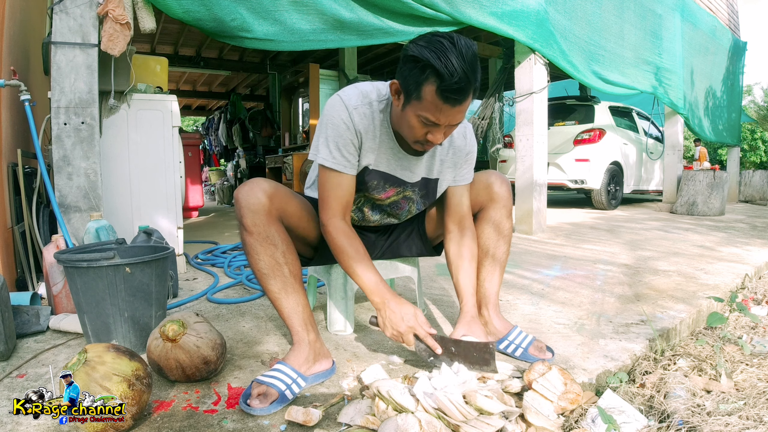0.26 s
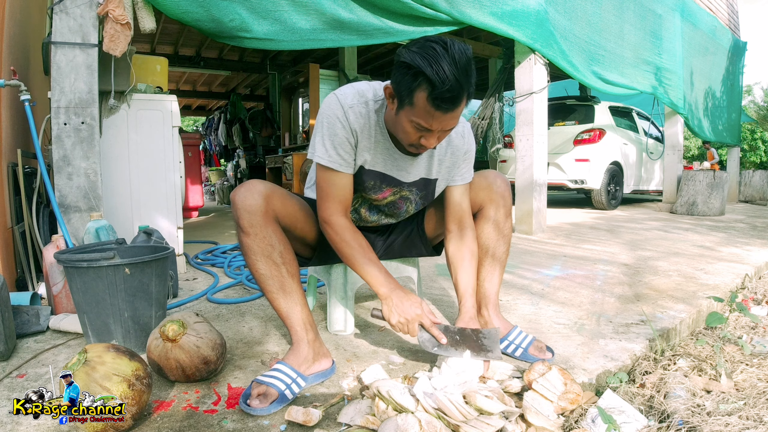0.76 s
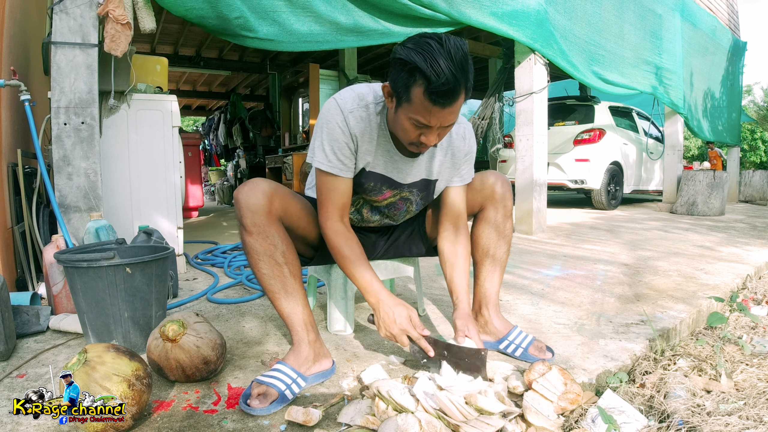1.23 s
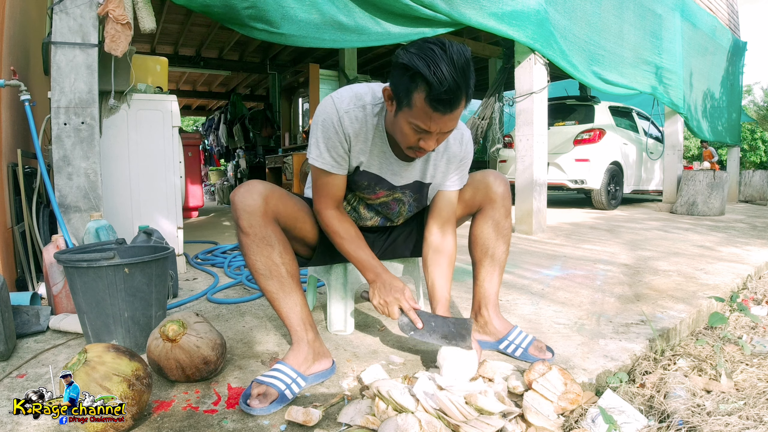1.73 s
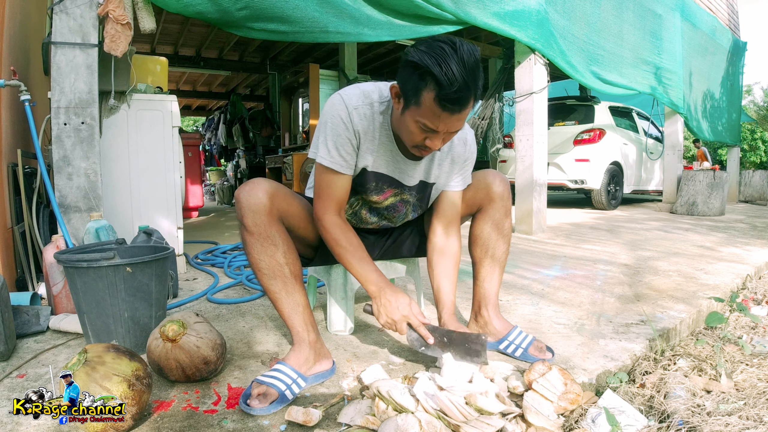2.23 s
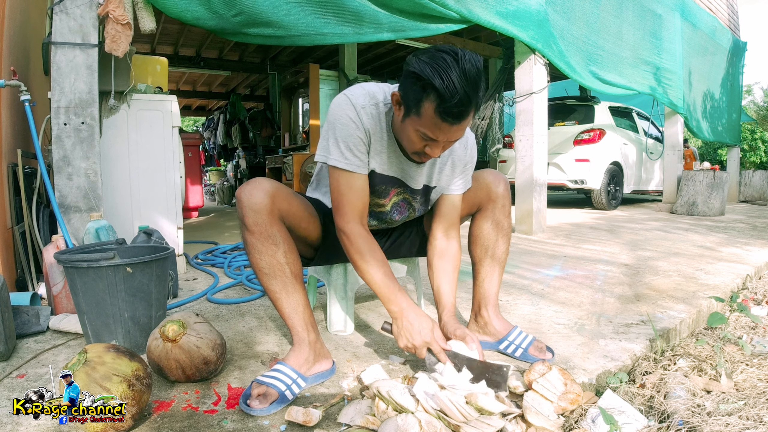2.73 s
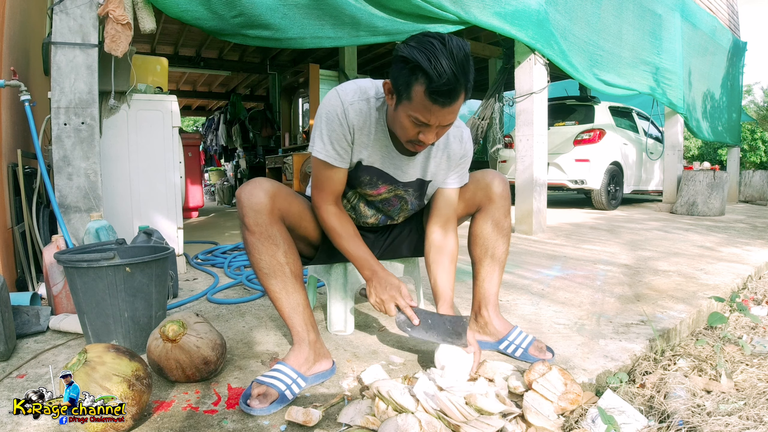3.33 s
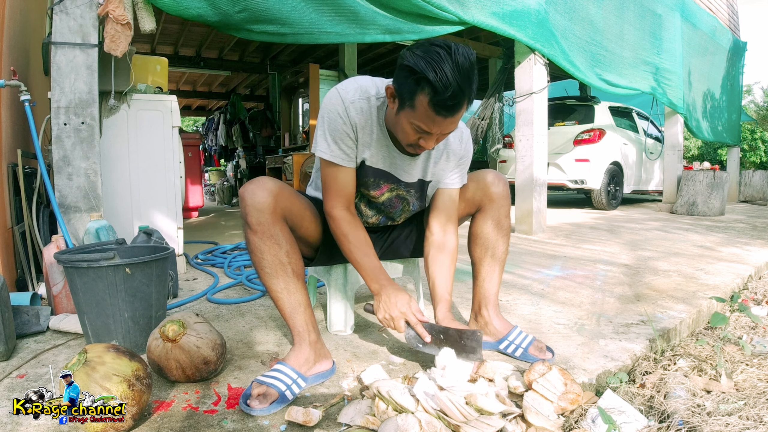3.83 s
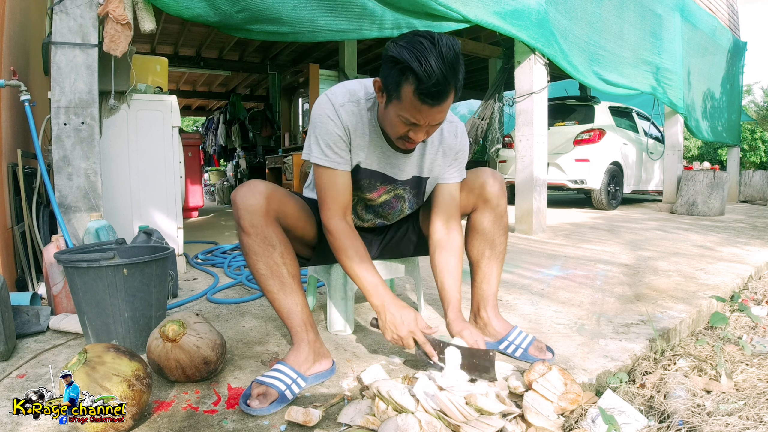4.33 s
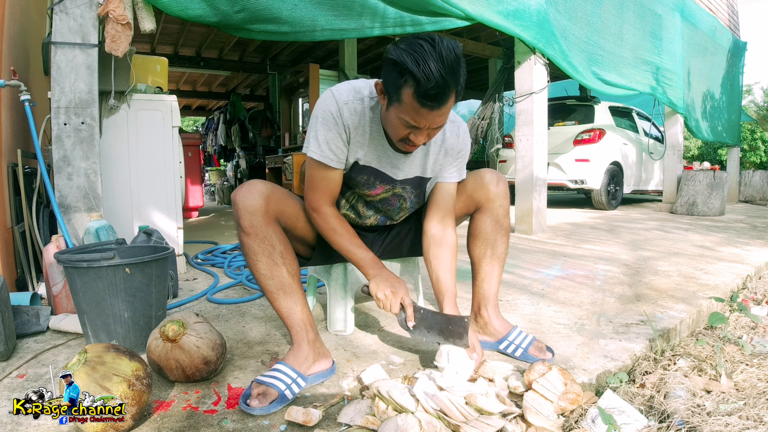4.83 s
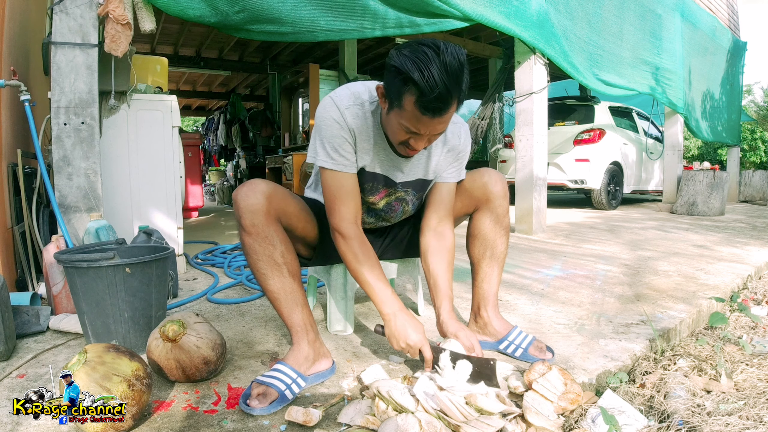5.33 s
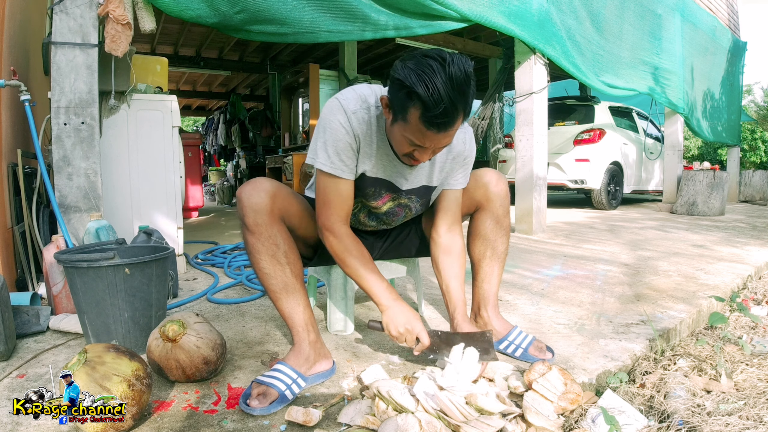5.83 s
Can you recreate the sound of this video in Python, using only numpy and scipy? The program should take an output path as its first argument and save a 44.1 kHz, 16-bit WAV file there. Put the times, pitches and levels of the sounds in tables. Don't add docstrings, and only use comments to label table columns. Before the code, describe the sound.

A close stereo microphone in an open yard picks up a cleaver working on a young coconut. At 0.1 s come bright fibre snaps with hollow knocks and low bumps on the ground; a sharp crack follows at 0.95. A distant bird warbles around 0.5-1.2, and a far engine swells low from 1.0 to 1.7. A small knock sounds at 1.6. From 2.0 to 2.2 a cluster of wet tearing cuts and snaps lands, with another short cut near 2.8. Hoarse chirps at 2.4 lead to long falling whistles at 2.6 and, louder, 3.6, after a quick rattle at 3.45. Softer, longer spongy slices run 3.7-4.35 and 5.2-5.5, with a faint one at 5.9. Low trills sound near 4.0 and 5.0; buzzing calls at 4.55 and 5.6 turn shrill among busy chirps. Wind thumps irregularly over steady far engine hum, leaves and bird wash.

```python
import sys
import numpy as np
from scipy import signal
from scipy.fft import rfft, irfft, next_fast_len
from scipy.io import wavfile
from scipy.ndimage import uniform_filter1d, map_coordinates

SR = 44100
rng = np.random.default_rng(int(sys.argv[2]) if len(sys.argv) > 2 else 0)


def bounce(signal):
    frames = np.transpose(np.atleast_2d(signal))
    limited = np.clip(frames, -1, 1)
    pcm = np.round(limited * 32767).astype(np.int16)
    wavfile.write(sys.argv[1], SR, pcm)


def to_linear_factor(level_db):
    exponent = np.asarray(level_db, float) / 20
    return 10 ** exponent


N = 268128

# frequency in Hz, level in dB per Hz.
TEAR_SPECTRUM = [(3240, -34.5), (5500, -14), (6210, -7), (6870, -13.5), (7460, -9.5), (7940, -11.5),
                 (8640, -8.5), (10300, -20.5), (13400, -33.5), (22000, -120)]
# frequency in Hz, level in dB per Hz.
PITH_SPECTRUM = [(400, -15), (900, 1), (1500, -3), (2400, 4.5), (4000, 6), (5200, 0.5), (6500, -68)]
# frequency in Hz, level in dB per Hz.
FIZZ_SPECTRUM = [(9000, -48), (10300, -14), (11500, -3), (12700, 0), (14600, -2.5), (15400, -7.5)]


def cutting():
    # start in seconds, hold in seconds, tearing level in dB, body in dB over it.
    pushes = [(0.05, 0.035, -70, 2), (0.067, 0.029, -63.5, 7), (0.133, 0.0094, -50.5, 2),
              (0.192, 0.021, -62.5, 11), (0.291, 0.05, -69.5, 18.5), (0.924, 0.013, -65, 19.5),
              (0.958, 0.016, -49.5, 5), (2.018, 0.085, -50, 4), (2.124, 0.035, -44.5, 9.5),
              (2.758, 0.026, -50.5, 6.5), (2.833, 0.0062, -57.5, 12), (3.667, 0.086, -61, 14),
              (3.909, 0.09, -52.5, 6), (3.944, 0.065, -54.5, 11.5), (4.142, 0.037, -51, 10),
              (4.194, 0.077, -48, 9.5), (4.273, 0.073, -55.5, 12.5), (5.178, 0.043, -59, 14),
              (5.231, 0.19, -50, 6.5), (5.467, 0.0064, -44, 3.5), (5.872, 0.029, -64, 12.5)]
    s, hold, db, body_db = np.transpose(pushes)
    tear_db = swells_db(s, hold, db, in_db_per_s=575.5, out_db_per_s=324.5)
    pith_db = swells_db(s, hold, db + body_db, in_db_per_s=319, out_db_per_s=298)
    breaks = patched(crackle(spiky_db=2.5, clump_db=-0.15), patchy_db=3.5, bins=4.4, frames=5)
    fizz_db = 2.0 + 1.5 * np.minimum(tear_db + 54, 0)
    hiss = coloured(breaks, TEAR_SPECTRUM) * to_linear_factor(4.5) + coloured(breaks, FIZZ_SPECTRUM) * to_linear_factor(fizz_db)
    body = coloured(breaks, PITH_SPECTRUM) * to_linear_factor(pith_db)
    return spread(hiss * to_linear_factor(tear_db) + body, lag_ms=0.016, apart=0.33)


def crackle(spiky_db, clump_db):
    size = to_linear_factor(spiky_db * rng.exponential(size=(3, N)) + clump_db * wobble(49))
    return size * rng.standard_normal((3, N))


def snaps():
    # start in seconds, peak level in dB, body in dB over it.
    fibres = [(0.1131, -26, -20), (0.1356, -11, -31), (0.9178, -29, -10.5), (0.9657, -4.5, -47),
              (1.4431, -62, 9), (2.0053, -25, -10), (2.1196, -9.5, -16.5), (2.1304, -29, 0),
              (2.1474, -16, -9), (2.1564, -20, -27), (2.1894, -12, -22.5), (2.7342, -43, -9),
              (2.7761, -35, -27), (3.8871, -42.5, 8.5), (3.907, -42, -23), (4.1405, -24.5, -16),
              (4.2794, -41, -6), (5.2547, -21, -9), (5.3894, -31, -2), (5.4675, -21, -14),
              (5.4747, -15, -13.5), (5.4994, -18, -11), (5.5114, -14, -28), (5.876, -43, -16),
              (6.0257, -51.5, 8.5)]
    bright, dull = np.zeros(N + SR), np.zeros(N + SR)
    t = np.arange(SR // 20) / SR
    for s, db, body_db in fibres:
        start = round(s * SR)
        burst = rng.standard_normal((2, len(t))) * (1 - np.exp(-t / 0.00048))
        bright[start:][:len(t)] += to_linear_factor(db - 60 * t / 0.014) * burst[0]
        dull[start:][:len(t)] += to_linear_factor(db + body_db - 60 * t / 0.043) * burst[1]
    crack = filtered(bright[:N], lambda hz: to_linear_factor(along(TEAR_SPECTRUM, hz)) + to_linear_factor(along(FIZZ_SPECTRUM, hz) - 7.5))
    push = filtered(dull[:N], lambda hz: to_linear_factor(along(PITH_SPECTRUM, hz)))
    return to_linear_factor(-8.5) * crack + to_linear_factor(-1.5) * push


def knocks():
    # start in seconds, peak level in dB, ring in Hz, t60 in seconds.
    chips = [(0.067, -34, 806, 0.38), (0.079, -29.5, 875, 0.98), (0.169, -22, 890, 0.13),
             (0.18, -26, 875, 0.054), (0.193, -32, 1030, 0.047), (.045, -34.5, 2090, 0.32),
             (.074, -33, 2550, 0.18), (.172, -35, 2300, 0.11), (1.585, -36.5, 1500, 0.38),
             (0.934, -34, 1410, 0.087), (1.009, -32.5, 1090, 0.2), (1.578, -25.5, 910, 0.081),
             (1.599, -37, 975, 0.38), (2.147, -19, 2390, 0.065), (2.838, -25, 1740, 0.036),
             (2.958, -33.5, 2350, 0.08), (3.974, -28.5, 1670, 0.26), (5.379, -34, 2290, 0.063)]
    # start in seconds, peak level in dB, ring in Hz, t60 in seconds.
    bumps = [
        (0.066, -26.5, 357, 0.26),
        (0.101, -38, 339, 0.038),
        (0.216, -27.5, 274, 0.047),
        (2.13, -33, 315, 0.028),
    ]
    out, t = np.zeros(N + SR), np.arange(SR // 5) / SR
    for s, db, hz, t60 in chips + bumps:
        rattle = to_linear_factor(-60 * t / max(t60, .01)) * (1 - np.exp(-t / 0.0005)) * rng.standard_normal(len(t))
        ring = np.sin(2 * np.pi * hz * t) * to_linear_factor(-60 * t / 0.019)
        wood = 0.76 * np.sin(2 * np.pi * hz * 1.335 * t) * to_linear_factor(-60 * t / 0.0023)
        thud = signal.fftconvolve(rattle, ring + 3 * wood)[:len(t)]
        thud = signal.lfilter(*signal.butter(2, .75 * hz, 'high', fs=SR), thud)
        out[round(s * SR):][:len(t)] += to_linear_factor(db - 4.0) * thud / np.abs(thud).max()
    return filtered(out[:N], lambda hz: 1 / (1 + 1j * hz / 4500) ** 2)


def birds():
    side, beats, rasp, buzz = whistlers(), trillers(), hoarse_chirpers(), buzzer()
    front = warbler() + low_triller()
    direct = ports(side + beats, lag_ms=.11) + ports(1.1 * rasp, lag_ms=.06)
    direct += ports(buzz, lag_ms=0.09) + ports(front, lag_ms=0.043)
    echoed = to_linear_factor(-4) * side + to_linear_factor(-8.5) * beats + to_linear_factor(4.0) * rasp + to_linear_factor(4.5) * buzz + to_linear_factor(-3.9) * front
    return direct + walls(echoed, wet_db=0.5)


def whistlers():
    # start in seconds, length in seconds, from Hz, to Hz, level in dB.
    low = [
        (2.532, .05, 3290, 3270, -46),
        (2.583, 0.24, 3250, 3150, -36.5),
        (3.63, 0.263, 3207, 3143, -28.5),
        (5.21, 0.17, 3100, 3020, -45),
    ]
    mid = [
        (2.11, .09, 3766, 3920, -52),
        (2.928, 0.047, 3950, 3880, -51),
        (2.988, .035, 3880, 3880, -57),
        (4.29, 0.1, 3830, 4030, -34.5),
        (5.375, 0.07, 3990, 3820, -30),
    ]
    high = [
        (3.603, .062, 4900, 4740, -31.5),
        (3.682, .025, 4700, 4570, -51),
        (3.968, .026, 3950, 4800, -45),
        (4.714, .026, 4900, 4980, -46),
    ]
    soft = [
        (2.41, 0.08, 2720, 2640, -49),
        (4.41, 0.0344, 2720, 2655, -49),
        (4.452, 0.037, 2464, 2444, -45),
        (5.5, 0.032, 2530, 2456, -45.5),
        (5.805, 0.096, 2550, 2820, -46),
    ]
    # start in seconds, length in seconds, pitch in Hz, level in dB.
    pips = [
        (2.465, 0.043, 6850, -76),
        (2.58, .018, 7500, -70),
        (2.94, 0.039, 6800, -71),
        (2.94, 0.055, 12400, -79),
        (3.578, 0.026, 5090, -41.5),
        (3.945, 0.021, 3750, -47),
    ]
    side = whistle(notes(low, attack=.2, release=.35, sag_db=-10), 0.57, [-27, -40], rough_db=1.5, jitter=0.0052)
    side += whistle(notes(mid, attack=0.037, release=0.38, sag_db=-3.5), 2.0, [-45], rough_db=3, jitter=0.0116)
    side += whistle(notes(high, attack=.05, release=.3, sag_db=-5), 2, [-50], rough_db=2.6, jitter=0.015)
    side += whistle(notes(soft, attack=.4, release=.25, sag_db=-1), .1, [-40], rough_db=2.1, jitter=0.0095)
    return side + chirps(glides(pips, by=.995), db_all=12.5)


def trillers():
    # first beat in seconds, length in seconds, from Hz, to Hz, level in dB.
    runs = [
        (1.918, .23, 2770, 3270, -45.5),
    ]
    rattles = [
        (3.436, 0.135, 2750, 2826, -38),
    ]
    rattle = trills(rattles, 76, fall=0.16, bend=2.8, sharp=1.6) * to_linear_factor(3.6 * wobble(count=50))
    return trills(runs, 53, fall=0.126, bend=2.98, sharp=0.6) + rattle


def hoarse_chirpers():
    # start in seconds, from Hz, level in dB.
    ups = [
        (1.44, 3500, -67),
        (1.675, 4030, -63),
        (2.385, 3810, -45.5),
        (2.405, 3960, -52),
        (3.964, 3730, -49),
        (4.63, 3300, -47),
        (4.655, 3480, -52),
        (4.705, 4020, -53),
        (5.738, 3260, -46),
    ]
    downs = [
        (2.338, 5230, -50.5),
        (4.735, 4500, -49.5),
        (5.065, 3460, -48.5),
    ]
    # start in seconds, length in seconds, from Hz, level in dB.
    held = [(4.85, 0.03, 9000, -69), (1.075, 0.022, 3600, -62), (1.67, .05, 4570, -64),
            (2.34, .11, 5100, -56), (2.37, 0.1, 4460, -54), (4.115, 0.086, 2950, -60),
            (4.31, 0.035, 2100, -60.5), (.908, .014, 4650, -55), (1.65, 0.029, 4044, -60),
            (2.365, 0.037, 3740, -46.5), (2.49, 0.033, 5050, -61), (4.245, 0.017, 3720, -39.5),
            (4.395, 0.017, 1950, -55.5), (4.64, 0.038, 2580, -60), (4.672, 0.016, 4540, -50),
            (4.716, 0.011, 4700, -52), (4.74, 0.043, 4600, -69), (5.155, 0.024, 2650, -61),
            (5.24, .045, 3810, -57), (5.277, 0.022, 2270, -52), (5.77, .11, 2059, -63.5),
            (5.872, 0.016, 4800, -67), (5.52, 0.064, 2774, -62.5), (4.6, 0.12, 3040, -55),
            (5.62, 0.064, 4460, -61), (5.047, 0.058, 3720, -49.5), (5.085, 0.033, 3720, -54),
            (5.085, 0.023, 2225, -50.5), (5.66, 0.082, 2735, -57), (5.655, 0.04, 3160, -56)]
    rising = [
        (4.57, .1, 3750, -58.5),
        (4.66, 0.054, 3900, -55),
        (5.76, .06, 3590, -59),
        (1.095, 0.051, 4420, -61),
        (1.96, 0.11, 3375, -54.5),
        (3.47, 0.033, 3130, -60),
        (5.61, 0.048, 3900, -59),
        (5.68, 0.05, 7400, -70),
    ]
    calls = glides(held, by=1) + glides(rising, by=1.12)
    for rows, by in ((ups, 1.29), (downs, .71)):
        calls += glides([(s, .026, hz, db) for s, hz, db in rows], by)
    rasp = 0.5 + 0.55 * wobble(count=600) + 0.26 * wobble(count=1500)
    return chirps(calls, db_all=9.0) * rasp * to_linear_factor(2.1 * wobble(count=90))


def buzzer():
    # start in seconds, length in seconds, from Hz, to Hz, level in dB.
    buzzes = [
        (4.54, 0.27, 3500, 3539, -44.5),
        (5.595, 0.32, 3527, 3490, -43.5),
    ]
    # start in seconds, length in seconds, pitch in Hz, level in dB.
    shrill = [
        (4.7, .11, 14100, -73),
        (5.735, 0.12, 14080, -69),
    ]
    points = notes(buzzes, attack=.05, release=0.17, sag_db=-2.0)
    buzz = whistle(points, .1, [-17, -19], rough_db=3.0, jitter=0.00616)
    return buzz + chirps(glides(shrill, by=1), db_all=0.5) * to_linear_factor(3 * wobble(count=130))


def warbler():
    # seconds after its start, length in seconds, from and to as shares of its pitch, level in dB.
    phrase = [
        (0, 0.021, 1.0, 1.1, -0.5),
        (.015, 0.016, 1.09, 0.85, 2),
        (0.027, 0.0135, 1, 0.65, -9.5),
        (0.044, 0.037, 0.51, 1.1, -5.5),
        (.062, .016, 1.12, .97, 2.5),
        (.076, 0.01125, 0.87, 1.1, 9),
        (.11, 0.02, 1.1, 0.95, -15),
    ]
    # start in seconds, pitch in Hz, level in dB, growth in dB per second, slowness.
    warbles = [
        (.508, 2880, -52, -230, 1.05),
    ]
    # start in seconds, length in seconds, from Hz, to Hz, level in dB.
    twists = [(0.813, 0.026, 3300, 3450, -62), (0.837, 0.014, 3400, 2930, -48),
              (0.845, 0.0086, 3300, 2800, -51), (0.859, 0.012, 2510, 3400, -47),
              (0.869, 0.019, 3340, 3160, -46), (0.892, .011, 3140, 2680, -47),
              (1.114, 0.021, 2880, 3250, -53.5), (1.129, 0.027, 3170, 2840, -49),
              (1.162, .022, 2410, 3600, -49), (1.187, .011, 3456, 2730, -44),
              (1.192, 0.013, 2750, 3020, -44.5), (1.228, 0.044, 2950, 2880, -62)]
    first = [(s + slow * dt, slow * length, hz * a, hz * b, db + d + grow * dt)
             for s, hz, db, grow, slow in warbles for dt, length, a, b, d in phrase]
    return chirps(first + twists, db_all=4.5) * to_linear_factor(1.75 * wobble(count=250))


def low_triller():
    # first beat in seconds, length in seconds, from Hz, to Hz, level in dB.
    coos = [
        (3.953, .27, 1690, 1760, -50.5),
    ]
    tired = [
        (4.952, 0.315, 1664, 1650, -50),
        (6.03, .089, 1560, 1584, -56),
    ]
    steady = trills(coos, 29, fall=0.22, bend=0.82, sharp=1.3, lean=.5)
    return steady + trills(tired, 30.3, fall=0.22, bend=0.82, sharp=1.3, tire=.27, lean=.5)


def notes(rows, attack, release, sag_db):
    edge_db = -14
    a, r = np.clip([attack, release], .02, .49)
    shape = [(0, edge_db), (a, 0), (1 - r, sag_db), (1, sag_db + edge_db)]
    return [[(s + u * length, f0 + u * (f1 - f0), db + d) for u, d in shape] for s, length, f0, f1, db in rows]


def whistle(tables, db, overtones_db, rough_db, jitter):
    hz, level_db = curves(np.concatenate(tables))
    turn = 2 * np.pi * np.cumsum(hz * (1 + jitter * wobble(count=200))) / SR
    tone = np.sin(turn) + sum(to_linear_factor(o) * np.sin((k + 2) * turn) for k, o in enumerate(overtones_db))
    return np.sqrt(2) * tone * to_linear_factor(level_db + db + rough_db * wobble(count=130)) * gate(tables, fade=0.004)


def glides(rows, by):
    return [(s, length, hz, hz * by, db) for s, length, hz, db in rows]


def chirps(rows, db_all):
    out = np.zeros(N + SR)
    for s, length, from_hz, to_hz, db in rows:
        u = np.arange(int(length * SR)) / (length * SR)
        turn = 2 * np.pi * length * (from_hz * u + (to_hz - from_hz) * u * u / 2)
        swell = np.sin(np.pi / 2 * np.clip(5 * np.minimum(u, 1 - u), 0, 1)) ** 2
        out[round(s * SR):][:len(u)] += to_linear_factor(db + db_all) * swell * np.sin(turn)
    return out[:N]


def trills(rows, beats, fall, bend, sharp, tire=0, lean=0.56):
    out = np.zeros(N + SR)
    for s, length, from_hz, to_hz, db in rows:
        t = np.arange(int(length * SR)) / SR
        beat = t * beats * (1 - tire * t) % 1
        hz = from_hz + (to_hz - from_hz) * t / length
        hz = hz * (1 + fall * (np.exp(-bend * beat) - np.exp(-bend * 0.4)))
        swell = np.sin(np.pi * (0.021 + 0.99 * t / length).clip(0, 1)) ** 0.67
        swell = swell * (0.15 + np.sin(np.pi * beat ** lean) ** sharp)
        out[round(s * SR):][:len(t)] += to_linear_factor(db + 6.0) * swell * np.sin(2 * np.pi * np.cumsum(hz) / SR)
    return out[:N]


def walls(x, wet_db):
    # frequency in Hz, t60 in seconds.
    decay = [(500, 0.23), (3000, 0.26), (6000, 0.37), (12000, 0.071)]
    out, step = np.zeros((2, N + 2 * SR)), SR // 2
    fade = np.sin(np.pi * np.arange(step) / step) ** 2
    for start in range(0, N, step // 2):
        hz, t, z = signal.stft(rng.standard_normal((2, step)), SR, nperseg=256)
        tail = signal.istft(z * to_linear_factor(-60 * t / along(decay, hz)[:, None]), SR, nperseg=256)[1]
        piece = x[start:start + step]
        echo = signal.fftconvolve((piece * fade[:len(piece)])[None], tail / np.linalg.norm(tail[0]), axes=1)
        first = start + 200
        out[:, first:first + echo.shape[1]] += echo
    return to_linear_factor(wet_db) * out[:, :N]


def wind():
    # start in seconds, hold in seconds, level in dB, flutter in dB over its calm level.
    gusts = [(0.043, 0.017, -41, 8.5), (0.303, .05, -43, -3), (1.054, 0.019, -30, 10.5),
             (1.383, 0.015, -31.5, 5), (1.787, 0.018, -39.5, -10), (2.12, 0.012, -43, 6),
             (2.232, 0.013, -56, 4), (2.806, 0.27, -65, 4.5), (3.128, 0.017, -26, 13),
             (3.696, 0.046, -41.5, -0.5), (3.86, 0.0091, -32.5, -4), (4.232, 0.017, -35, 4.5),
             (4.347, 0.016, -58, 5), (4.483, .02, -34.5, 1), (5.471, 0.017, -35, 3), (5.787, 0.064, -32, 9),
             (5.933, 0.059, -32.5, -8), (6.023, 0.024, -31, 7.5)]
    # frequency in Hz, level in dB per Hz.
    buffet_spectrum = [(7.1, -34), (12, 0), (38, 3), (80, 0), (100, -18), (180, -120)]
    flutter_spectrum = [(35, -16), (60, 0), (118, 0.5), (167, -16.5), (190, -25.5), (250, -19), (420, -120)]
    calm_db, calm_flutter_db = -45.5, -48
    s, hold, db, over_db = np.transpose(gusts + [(0, N / SR, calm_db, 0.017)])
    gust_db = swells_db(s, hold, db, in_db_per_s=303.5, out_db_per_s=110)
    flutter_db = swells_db(s, hold, calm_flutter_db + over_db, in_db_per_s=303.5, out_db_per_s=110)
    buffet = spread(coloured(rng.standard_normal((3, N)), buffet_spectrum), lag_ms=2.6, apart=0.83)
    flutter = spread(coloured(rng.standard_normal((3, N)), flutter_spectrum), lag_ms=0.33, apart=0.066)
    buffet = to_linear_factor(gust_db + 0.5 + 0.85 * wobble(18)) * buffet
    return buffet + to_linear_factor(flutter_db + 2.5 + 2.0 * wobble(10)) * flutter


def yard():
    # frequency in Hz, level in dB per Hz.
    hum_spectrum = [(94, -16.5), (160, -6.5), (210, -1.5), (258, -10.5), (279, -0.5), (353, -4.5),
                    (449, -9.5), (550, -14.5), (825, -14.5), (895, -15.5), (990, -14), (1580, -27.5),
                    (1800, -26.5), (2340, -34.5), (3960, -120)]
    chatter_spectrum = [(880, -58.5), (1500, -5), (1850, -6), (2600, -5), (2670, -4), (3340, -3),
                        (3710, -2), (5100, -12), (7010, -23), (8200, -48), (12300, -67), (15000, -56)]
    # time in seconds, level in dB.
    flock = [
        (0.0, -59),
        (.66, -65.5),
        (1.08, -58),
        (1.6, -65.5),
        (2.69, -56),
        (3.3, -63),
        (4.61, -53.5),
        (5.0, -61.5),
        (5.37, -52),
        (6.08, -59),
    ]
    chatter_db, = curves(flock)
    hum = patched(rng.standard_normal((3, N)), patchy_db=2.5, bins=1.2, frames=30)
    hum = spread(coloured(hum, hum_spectrum), lag_ms=0.083, apart=0.068)
    chatter = patched(rng.standard_normal((3, N)), patchy_db=5.0, bins=5.8, frames=13)
    chatter = spread(coloured(chatter, chatter_spectrum), lag_ms=0.073, apart=0.97)
    return to_linear_factor(-49.5 + 1.5 + 0.95 * wobble(15.0)) * hum + to_linear_factor(chatter_db + 3.5) * chatter


def groan():
    # start in seconds, hold in seconds, level in dB, pitch in Hz.
    rumbles = [
        (1.03, 0.035, -41, 226),
        (1.312, 0.066, -41.5, 215.4),
        (1.086, .04, -54, 337),
        (1.1, 0.11, -52, 425),
        (1.39, 0.031, -46.5, 352),
        (1.7, 0.023, -48.5, 210),
        (1.2, 0.069, -51, 277),
    ]
    out = np.zeros(N)
    for s, hold, db, hz in rumbles:
        band = unit(filtered(rng.standard_normal(N), lambda f: np.exp(-((f - hz) / 22) ** 2)))
        out += band * to_linear_factor(swells_db(*np.array([[s], [hold], [db]]), in_db_per_s=398, out_db_per_s=95))
    return out


def unit(x):
    return x / np.sqrt(np.mean(x ** 2) + 1e-20)


def along(points, hz):
    f, v = np.transpose(points)
    return np.interp(np.log(hz + 1), np.log(f + 1), v)


def curves(rows):
    s, *cols = np.transpose(rows)
    return [np.interp(np.arange(N) / SR, s, c) for c in cols]


def gate(tables, fade):
    t = np.arange(N) / SR
    return sum(np.clip(np.minimum(t - rows[0][0], rows[-1][0] - t) / fade + .5, 0, 1) for rows in tables).clip(0, 1)


def swells_db(s, hold, db, in_db_per_s, out_db_per_s):
    t = np.arange(0, N / SR, 1 / 1000)[:, None]
    each = db - in_db_per_s * np.maximum(s - t, 0) - out_db_per_s * np.maximum(t - s - hold, 0)
    return np.interp(np.arange(N) / SR, t[:, 0], 10 * np.log10(np.sum(to_linear_factor(each) ** 2, axis=1) + 1e-30))


def wobble(count):
    return map_coordinates(rng.standard_normal(int(N * count / SR) + 4), [np.arange(N) * count / SR])


def filtered(x, response):
    m = next_fast_len(N + 8192)
    return irfft(rfft(x, m) * response(np.fft.rfftfreq(m, 1 / SR)), m)[..., :N]


def coloured(x, spectrum):
    return unit(filtered(x, lambda hz: to_linear_factor(along(spectrum, hz))))


def patched(x, patchy_db, bins, frames):
    z = signal.stft(x, nperseg=512)[2]
    field = uniform_filter1d(rng.standard_normal(z.shape[1:]), int(bins), 0)
    field = uniform_filter1d(field, int(frames), 1)
    return signal.istft(z * to_linear_factor(patchy_db * unit(field)), nperseg=512)[1][:, :N]


def ports(x, lag_ms):
    return filtered(x, lambda hz: np.exp(-1j * np.pi * hz * lag_ms / 1000 * np.array([[1], [-1]])))


def spread(x, lag_ms, apart):
    share = np.clip(apart, 0, 1)
    return np.sqrt(1 - share) * ports(x[0], lag_ms) + np.sqrt(share) * x[1:]


def evened(x):
    z = signal.stft(x, nperseg=512, noverlap=384)[2]
    size = np.sqrt(np.mean(np.abs(z) ** 2, axis=0))
    return signal.istft(size * np.exp(1j * np.angle(z)), nperseg=512, noverlap=384)[1][:, :N]


def microphone_hiss(dry):
    spectrum = [(2000, -39), (6000, 1.0), (12600, -10.0), (12900, -14.5), (15500, -26)]  # (Hz, dB per Hz)
    hiss = to_linear_factor(-90.5 + 14.5) * coloured(rng.standard_normal((2, N)), spectrum)
    mids = filtered(dry[0], lambda hz: (hz > 2500) * (hz < 6000))
    level_db = 10 * np.log10(np.abs(uniform_filter1d(mids ** 2, size=2048)) + 1e-12)
    return hiss * to_linear_factor(-0.92 * np.maximum(level_db + 45, 0))


def scene():
    hits = snaps() + knocks()
    knife = cutting() + ports(hits, lag_ms=0.013) + walls(hits, wet_db=-12.0)
    return knife + birds() + wind() + yard() + groan()


def low_pass(x):
    return signal.sosfilt(signal.butter(12, 15740, fs=SR, output="sos"), x)


def record(dry):
    heard = evened(dry + microphone_hiss(dry))
    top_hz = 15650
    mix = filtered(heard, lambda hz: np.clip((top_hz - hz) / 300, 0, 1))
    return low_pass(mix)


dry = scene()
out = record(dry)
bounce(out)
```